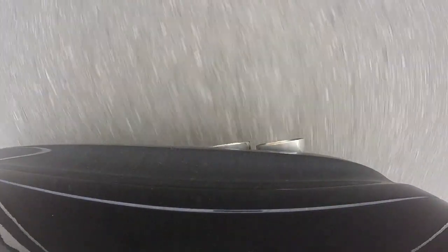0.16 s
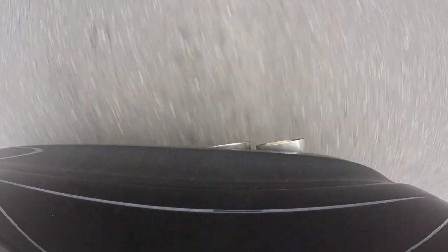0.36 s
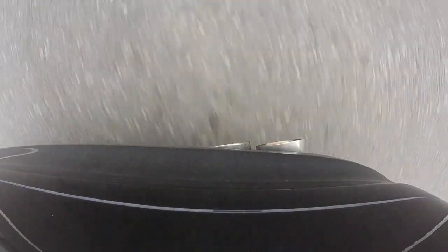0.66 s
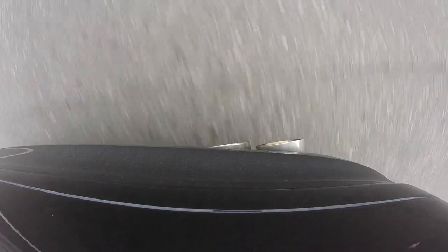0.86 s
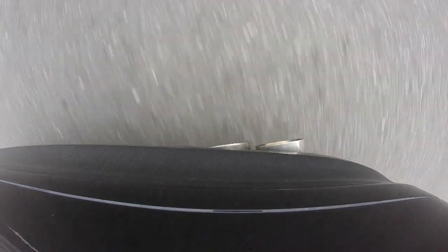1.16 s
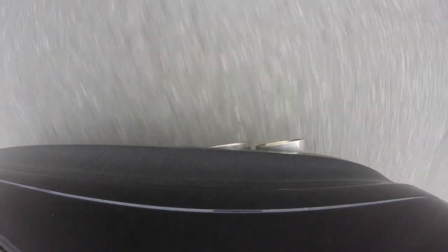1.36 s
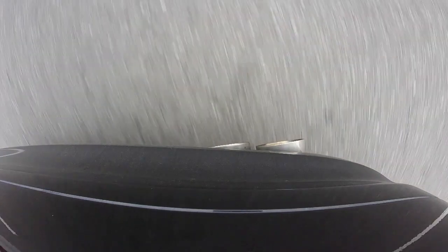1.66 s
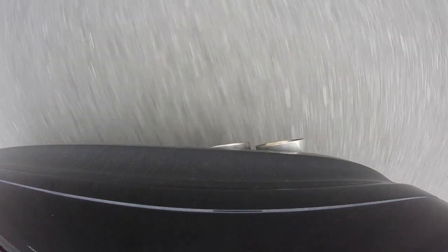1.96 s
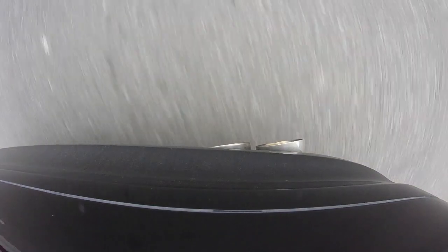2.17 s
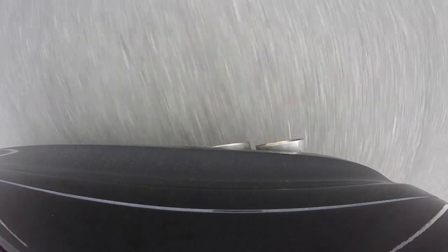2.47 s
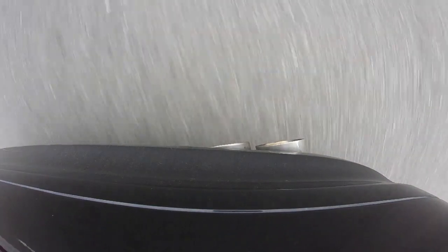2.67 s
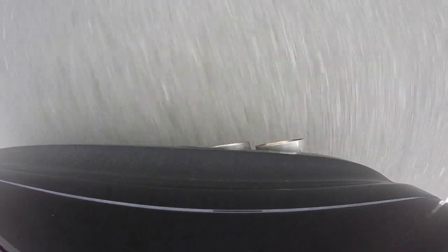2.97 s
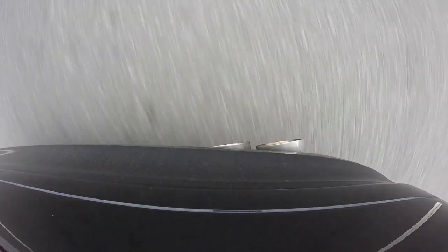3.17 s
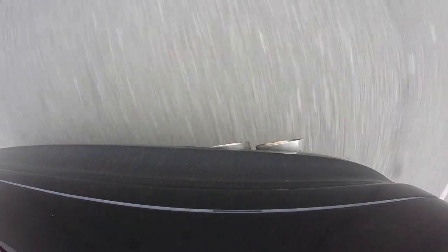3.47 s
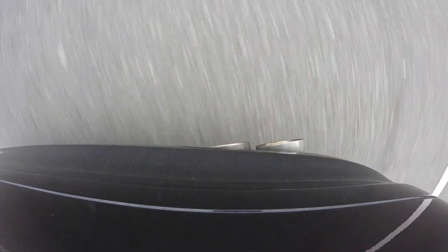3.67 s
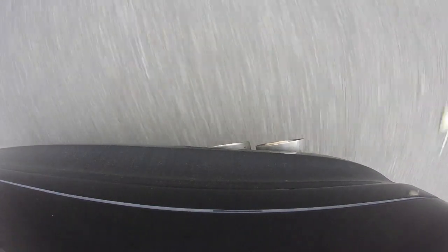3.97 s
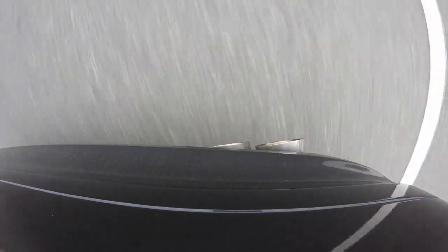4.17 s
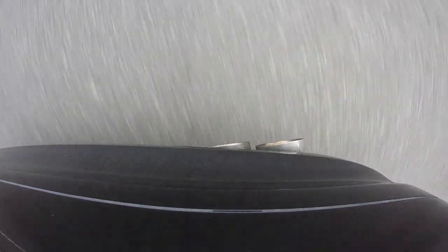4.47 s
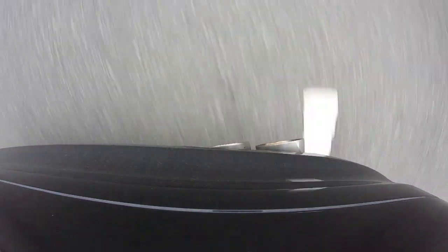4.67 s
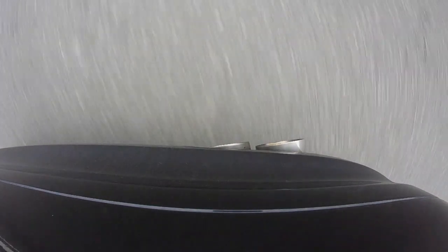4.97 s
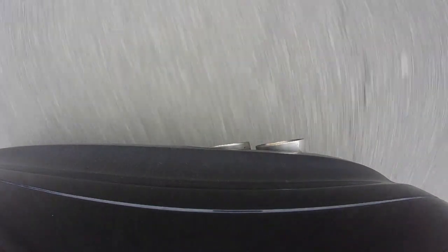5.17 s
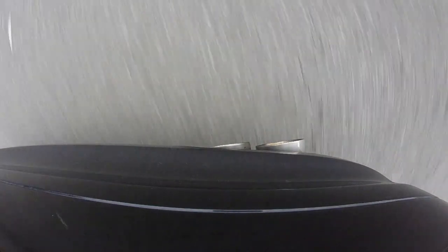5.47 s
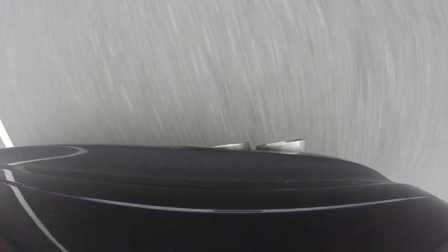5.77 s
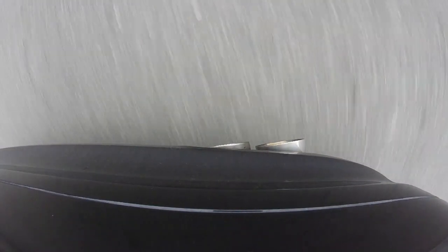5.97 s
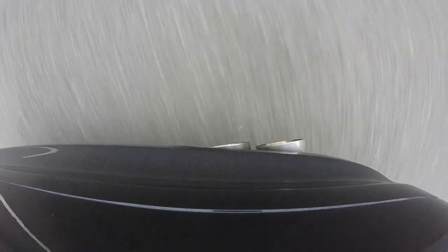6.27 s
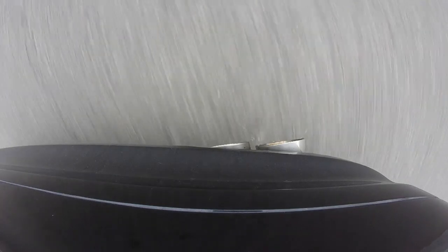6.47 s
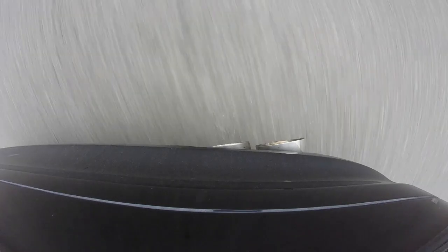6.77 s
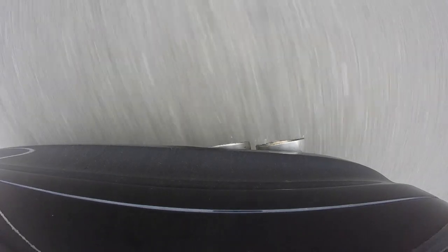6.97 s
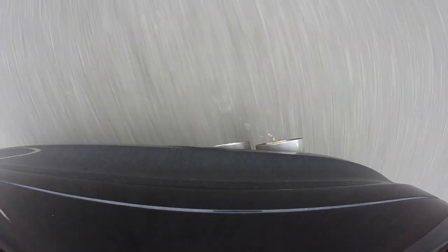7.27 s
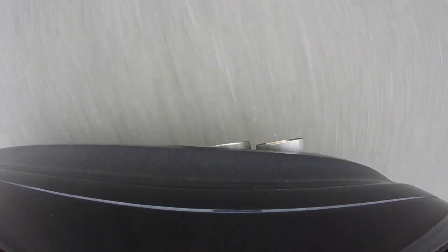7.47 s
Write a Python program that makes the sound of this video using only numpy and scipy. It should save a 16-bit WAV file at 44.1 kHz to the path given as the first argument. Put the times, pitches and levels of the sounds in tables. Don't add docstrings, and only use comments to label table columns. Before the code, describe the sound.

Six-cylinder car coasts briefly, then accelerates hard in one long rising exhaust drone with rasp, wind thumping the microphone, lifting off at the end.

```python
import sys
import numpy as np
from scipy import signal
from scipy.fft import rfft, irfft
from scipy.io import wavfile
from scipy.ndimage import uniform_filter1d

SR = 44100
rng = np.random.default_rng(int(sys.argv[2]) if len(sys.argv) > 2 else 0)


def unload_audio(sound):
    columns = np.transpose(np.atleast_2d(sound))
    steps = np.round(np.clip(columns, -1, 1) * 32767)
    wavfile.write(sys.argv[1], SR, steps.astype(np.int16))


def decibels_to_gain(level_db):
    exponent = np.asarray(level_db, float) / 20
    return 10 ** exponent


N = 336042
SIZE = 2 ** 19
HZ = np.arange(SIZE // 2 + 1) * SR / SIZE + 1e-3
FULL_EFFORT_DB = -25


def columns(table):
    seconds, *rest = np.transpose(table)
    return [np.interp(np.arange(N) / SR, seconds, column) for column in rest]


def unit(x):
    return x / np.sqrt(np.mean(x ** 2))


def steady(x, seconds):
    return x / np.sqrt(uniform_filter1d(x ** 2, int(seconds * SR)) + 1e-9)


def walk(rate):
    hold = int(SR / rate)
    steps = np.repeat(rng.standard_normal(N // hold + 1), hold)
    return 1.08 * uniform_filter1d(uniform_filter1d(steps, hold), hold)[:N]


def slope(points):
    hz, db = np.transpose(points)
    return decibels_to_gain(np.interp(np.log(HZ), np.log(hz), db, left=-60))


def resonances(hz, modes, floor_db):
    power = sum(decibels_to_gain(2 * db) / (1 + (2 * (hz - f) / w) ** 2) ** 2 for f, w, db in modes)
    return np.sqrt(power + decibels_to_gain(2 * floor_db))


def colour(x, gain):
    cepstrum = irfft(np.log(gain))
    cepstrum[1:SIZE // 2] *= 2
    cepstrum[SIZE // 2 + 1:] = 0
    return irfft(rfft(x, SIZE) * np.exp(rfft(cepstrum)))[:N]


def swell(s, db, length):
    return decibels_to_gain(db) * np.exp(-((np.arange(N) / SR - s) / max(length, .01)) ** 2)


def law(full_db, per_effort, per_lift, effort_db, lift_db):
    return full_db + per_effort * (effort_db - FULL_EFFORT_DB) + per_lift * lift_db


# f/Hz, width/Hz, level/dB
CASE_MODES = [(231.7, 81.4, 9), (345.6, 57, 10), (634, 530, -4.5), (1309, 253, 3), (1526, 166, 0.5),
              (2030, 240, -16.5), (2627, 500, -10.5), (3422, 550, -11), (4176, 300, -14),
              (4590, 560, -25.5), (5190, 390, -26), (5830, 960, -32.5), (6450, 600, -29), (7200, 700, -36),
              (8260, 1200, -35.5), (9900, 2300, -46.5), (11800, 1000, -44), (13800, 2500, -55)]


def case_ringing():
    return resonances(HZ, CASE_MODES, -59.5)


# start t/s, end t/s, drop level/dB
LIFTS = [
    (-.1, .08, -14),
    (.36, .6, -14),
    (7.16, 7.8, -10),
]


def throttle(lead_s, ramp_s):
    t = np.arange(N) / SR
    return sum(db * np.clip(np.minimum(t + lead_s - a, b - t) / ramp_s + .5, 0, 1) for a, b, db in LIFTS)


# f/Hz, width/Hz
NOTCHES = [
    [(287, 18), (340, 8.3), (405, 31)],
    [(257, 18), (339, 5.8), (412, 58)],
]


def notched(k, bank_hz):
    return np.prod([1 - .99 / (1 + (2 * (k * bank_hz - f) / w) ** 2) for f, w in NOTCHES[k % 2]], axis=0)


# f/Hz, width/Hz, level/dB
FIRING_MODES = [(81.5, 6.8, -20), (89.6, 11, -23), (115, 14, -28), (130.6, 11, -14), (146.31, 24, -20),
                (180.2, 37, -18.5), (194.1, 5.2, -13.5), (219.2, 42.6, -13), (252.5, 18, -16.5)]
# f/Hz, width/Hz, level/dB
THIRD_MODES = [(158, 31, -31), (181.2, 19, -22), (197.4, 20, -21.5), (220.4, 18.6, -15),
               (283.87, 24, -24.5), (315.3, 11, -27.5), (364.5, 33, -18)]
# f/Hz, width/Hz, level/dB
FOURTH_MODES = [(197.1, 15, -22.5), (222.8, 26, -13), (267.6, 20.2, -13), (318, 6, -28), (362.8, 29, -15),
                (423, 110, -29), (506, 29, -40)]
# f/Hz, width/Hz, level/dB
FIFTH_MODES = [(235, 63, -43), (300, 130, -39.5), (356.5, 26, -20), (498, 93, -30.5), (562, 51, -37),
               (620, 67, -29.5)]


def low_tones(bank_hz, effort_db, lift_db):
    gains = []
    for k, modes in enumerate((FIRING_MODES, THIRD_MODES, FOURTH_MODES, FIFTH_MODES), start=2):
        level_db = law(1, 0.12, 1.23, effort_db, lift_db)
        level_db = level_db + 0.29 * lift_db * (k > 2)
        gains.append(decibels_to_gain(level_db) * resonances(k * bank_hz, modes, -49.5) * notched(k, bank_hz))
    return gains


# f/Hz, width/Hz, level/dB
PIPE_MODES = [(220, 31, 0.5), (292, 130, 5.5), (358.1, 26, 20), (444, 54, 3), (597.4, 63, 4.5),
              (695, 77, 1.5), (790, 65, -0.5), (874.2, 44, -3), (997, 45, -6.5), (1144, 99, -9.5),
              (1300, 490, -10)]
UPPER_TONES_DB = [-0.5, 4.5, 2.5, 1, -6, -1.5, -5, -6.5, -3.5]


def drone(turns, bank_hz, low_gain, upper_db, sharp_db):
    out = decibels_to_gain(upper_db - 8.5 + 2.0 * walk(36)) * np.sin(2 * np.pi * turns + .3 * walk(25))
    for k, gain in enumerate(low_gain, start=2):
        out = out + gain * decibels_to_gain(.5 * walk(20)) * np.sin(2 * np.pi * k * turns + 0.062 * walk(25))
    for k, tone_db in enumerate(UPPER_TONES_DB, start=6):
        gain = decibels_to_gain(upper_db + tone_db - 10 + 3.7 * walk(4.6)) * resonances(k * bank_hz, PIPE_MODES, -26.5)
        gain = gain * notched(k, bank_hz) * decibels_to_gain(0.076 * (k - 5.5) * sharp_db)
        spread = -.35 * (k - 7) ** 2 + .015 * k * walk(30)
        out = out - gain * np.cos(2 * np.pi * k * (turns + .1) + spread)
    return np.sqrt(2) * out


def cylinders(turns, upper_db):
    cycle = (2 * turns).astype(int)
    size = np.array([0.37, -0.19, -0.0013, 0.58, 0.073, 1.0])[cycle % 6]
    size = size + 0.067 * rng.standard_normal(cycle[-1] + 1)[cycle]
    kicks = size * (np.diff(cycle, prepend=0) > 0)
    dull = slope([(70, -8.0), (300, -20.5), (1000, -5.0), (3000, -48.5), (9000, -84.5)])
    return decibels_to_gain(upper_db - 10.5) * steady(colour(kicks, resonances(HZ, PIPE_MODES, -26.5) * dull), 0.22)


# f/Hz, level/dB
KNOCK_COLOUR = [(600, -26), (900, -13.5), (1100, 0.5), (1300, 5.5), (1600, 12), (1900, -16), (2700, -2),
                (3500, 1), (4500, -0.5), (9000, -15), (15000, -19.5)]
# f/Hz, level/dB
GAS_COLOUR = [(100, -14), (400, -4.5), (800, 0), (1400, -0.5), (3000, -4), (4400, -5.5), (5500, -12),
              (15000, -30.5)]
# f/Hz, level/dB
JET_COLOUR = [(1500, 4), (2700, -3), (3450, 2), (4200, 3.5), (6500, 2), (8500, 3), (12000, 0.5),
              (15000, -3)]


def gas(turns, rasp_db, jet_db, share, case):
    place = 2 * turns + .35 + .005 * walk(60)
    cycle = np.maximum.accumulate(place.astype(int))
    scatter = rng.standard_normal(cycle[-1] + 1)[cycle]
    fronts = -decibels_to_gain(1.0 * scatter - 15 * (cycle % 2)) * (np.diff(cycle, prepend=0) > 0)
    knock = steady(colour(fronts, case * slope(KNOCK_COLOUR)), 0.11)
    puffs = .6 + decibels_to_gain(3.0 * scatter - 3.0 * (cycle % 2)) * np.exp(-(place % 1) / .3)
    rasp = unit(colour(puffs * rng.standard_normal(N), case * slope(GAS_COLOUR)))
    jet = unit(colour(puffs * rng.standard_normal(N), case * slope(JET_COLOUR)))
    mix = np.sqrt(1 - share) * decibels_to_gain(3.5 + 0.44 * walk(17)) * rasp + np.sqrt(share) * knock
    return decibels_to_gain(rasp_db) * mix + decibels_to_gain(jet_db + 20.5) * jet


# t/s, firing rate of one bank f/Hz, effort level/dB, sharpness of the pulses level/dB
ENGINE = [(0, 45.67, -64, -1), (.27, 40.62, -65, -5), (.61, 42.56, -63, 0.5), (1.25, 48.49, -42, -0.5),
          (1.84, 56.34, -40, 0), (2.65, 65.88, -34.5, 1), (3.44, 75.09, -37, -1.5),
          (4.54, 83.03, -36.5, 0.5), (4.85, 86.08, -32, -9.5), (5.11, 89.5, -27, -7),
          (5.45, 95.3, -27.5, 2.5), (5.6, 98.63, -25, 1), (6.03, 106.8, -25.5, 9), (6.17, 109.9, -30, -2.5),
          (6.6, 119.4, -28, -0.5), (6.96, 125.8, -28, -2), (7.12, 124.1, -28, -7),
          (7.62, 98.7, -26.5, -9.5)]


def engine(case):
    bank_hz, effort_db, sharp_db = columns(ENGINE)
    turns = np.cumsum(bank_hz) / SR
    lift_db = throttle(0, 0.029)
    gas_lift_db = throttle(.07, 0.11)
    upper_db = law(-24, 0.8, 1, effort_db + sharp_db, lift_db)
    rasp_db = law(-25.5, 0.99, 0.85, effort_db, gas_lift_db)
    jet_db = law(-52, 2.2, 1.6, effort_db, gas_lift_db) + 27.5 * np.log2(bank_hz / 105)
    jet_db = np.maximum(jet_db, -77 + gas_lift_db / 2)
    share = np.clip(0.73 * decibels_to_gain(effort_db - FULL_EFFORT_DB + lift_db + 0.57 * sharp_db), 0, .9)
    tones = drone(turns, bank_hz, low_tones(bank_hz, effort_db, lift_db), upper_db, sharp_db)
    return tones + cylinders(turns, upper_db) + gas(turns, rasp_db, jet_db, share, case)


# t/s, level/dB
ROAD = [(0, -44), (.5, -46), (1.5, -44), (3, -42.5), (5, -41.5), (7, -39.5), (7.62, -45.5)]
# f/Hz, level/dB
TYRE_COLOUR = [(60, 19.5), (200, 14), (450, -0.5), (1400, -2.5), (2300, 4.5), (3300, 5), (4200, -16),
               (5300, -3), (6450, 3), (7300, -0.5), (10000, 7), (13000, -2), (15000, -6)]


def tyres(case):
    grain = decibels_to_gain(0.39 * walk(60) + 0.24 * walk(1.1))
    roar = unit(colour(grain * rng.standard_normal(N), case * slope(TYRE_COLOUR)))
    return decibels_to_gain(columns(ROAD)[0] + 11) * roar


# t/s, level/dB
WIND = [(0, -27), (1, -26.5), (2, -17.5), (3.5, -22), (5, -17), (6.5, -21), (7.62, -14.5)]
# t/s, peak level/dB, length t/s
GUSTS = [(0.048, -16.5, 0.06), (0.245, -9, 0.071), (0.473, -14, 0.03), (0.667, -19, 0.027),
         (0.966, -17.5, 0.089), (1.262, -13, 0.043), (1.43, -9.5, 0.044), (1.725, -11.5, 0.021),
         (2.32, -16.5, 0.059), (2.477, -5.5, 0.017), (2.671, -7.5, 0.058), (3.07, -22, 0.04),
         (3.212, -9, 0.039), (3.373, -16.5, 0.038), (3.53, -8.5, 0.11), (3.788, -5.5, 0.031),
         (3.94, -8, 0.039), (4.081, -10, 0.027), (4.239, -13, 0.017), (4.987, -16.5, 0.018),
         (5.1, -11, 0.017), (5.402, -6.5, 0.037), (5.587, -8.5, 0.017), (5.731, -16, 0.027),
         (6.075, -5, 0.06), (6.63, -15, 0.05), (6.788, -20.5, 0.031), (6.946, -5, 0.027),
         (7.07, -9.5, 0.032), (7.254, -7, 0.05)]
# t/s, peak level/dB
BUFFETS = [(0.09, -20), (0.595, -26), (0.814, -14), (1.606, -23), (1.957, -22), (2.085, -12), (2.212, -30),
           (2.474, -24.5), (2.598, -20), (3.204, -23.5), (3.307, -17), (3.456, -25), (3.609, -20),
           (3.728, -15.5), (3.994, -18.5), (4.096, -19.5), (4.196, -16.5), (4.414, -18), (4.682, -14),
           (4.821, -16), (5.006, -20), (5.254, -20), (5.616, -23), (5.764, -29.5), (5.842, -16),
           (6.168, -26.5), (6.456, -22.5), (6.623, -12), (6.824, -13), (7.423, -18)]
# f/Hz, level/dB
THUMP_COLOUR = [(12, -12.5), (24, -12), (30, 9), (36, 8.5), (42, -6), (52, -11), (90, -72.5), (500, -100)]
# f/Hz, level/dB
BUFFET_COLOUR = [(35, -20.5), (50, 6.5), (65, 8.5), (82, -2.5), (110, -13.5), (300, -52), (2000, -68),
                 (6000, -100)]


def wind():
    level = decibels_to_gain(columns(WIND)[0])
    gusts = sum(swell(s + 0.035, db - 7, length) for s, db, length in GUSTS)
    buffets = sum(swell(s + 0.011, db - 10.5, 0.051) for s, db in BUFFETS)
    thump = steady(colour(rng.standard_normal(N), slope(THUMP_COLOUR)), .09)
    buffet = steady(colour(rng.standard_normal(N), slope(BUFFET_COLOUR)), 0.038)
    thumping = (level * decibels_to_gain(2.5 * walk(8.2)) + gusts) * thump
    return thumping + (level * decibels_to_gain(-6.5 + 4.1 * walk(11)) + buffets) * buffet


# start t/s, level/dB, length t/s
RATTLE = [(6.0655, -29, 0.004), (6.0773, -27.5, 0.0036), (6.091, -29, 0.0028), (6.103, -25.5, 0.005),
          (6.1124, -28, 0.0032), (6.1396, -34.5, 0.0053), (6.175, -36, 0.0045), (6.179, -34, 0.0066),
          (6.207, -29.5, 0.0044), (6.2454, -36.5, 0.0043), (6.2525, -28, 0.0036), (6.2754, -28.5, 0.004),
          (6.306, -36.5, 0.004), (6.335, -37.5, 0.004), (6.3545, -36.5, 0.0051), (6.363, -31, 0.004),
          (6.3744, -34.5, 0.004), (6.39, -41.5, 0.005), (6.461, -36, 0.004), (6.4905, -34, 0.004),
          (7.117, -39.5, 0.0032), (7.1185, -45, 0.0036), (7.259, -31.5, 0.0045), (7.2726, -27.5, 0.0048),
          (7.292, -34.5, 0.0055), (7.3194, -37, 0.0048), (7.3484, -39, 0.0058), (7.3616, -36.5, 0.004),
          (7.3844, -33, 0.004), (7.412, -41.5, 0.0017)]
# f/Hz, level/dB
RATTLE_COLOUR = [(500, -29.5), (2500, -2), (5000, 2), (8000, -0.5), (11000, -13), (15000, -14.5)]


def rattle(case):
    shape, t = np.zeros(N), np.arange(1200) / SR
    for s, db, length in RATTLE:
        i = int(s * SR)
        burst = decibels_to_gain(db - 8) * (1 - np.exp(-t / 0.0006)) * np.exp(-np.maximum(t - length, 0) / 0.002)
        shape[i:i + 1200] += burst[:N - i]
    gain = slope(RATTLE_COLOUR) * case ** 0.44
    gain = gain / np.sqrt(np.mean(gain ** 2))
    grit = rng.standard_normal(N) * decibels_to_gain(4.0 * walk(1500))
    soft = slope([(100, 5), (7000, -2.5), (12000, -3.5), (20000, -33)])
    bright = slope([(100, -22.0), (5000, -16.5), (9000, 6.5), (12000, -4), (16000, -8.5)])
    scrape = colour(shape * grit, gain * soft)
    crack = colour(shape ** 2 * decibels_to_gain(37.5) * grit, gain * bright)
    return decibels_to_gain(6.5) * scrape + crack


def scene():
    case = case_ringing()
    return (engine(case) + tyres(case) + wind() + rattle(case))[None]


def roll_off(x):
    return signal.sosfilt(signal.butter(12, 15250, fs=SR, output="sos"), x)


def record(dry):
    hiss = decibels_to_gain(-101) * rng.standard_normal(dry.shape)
    soft = np.tanh(.9 * dry) / .9
    return roll_off(soft + hiss)


dry = scene()
out = record(dry)
unload_audio(out)
```